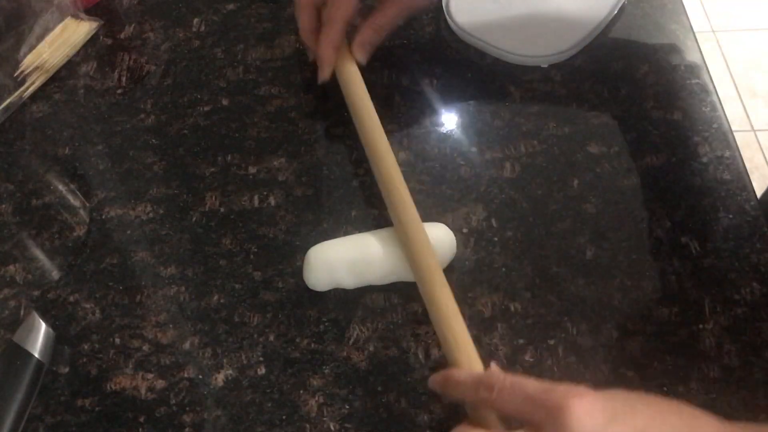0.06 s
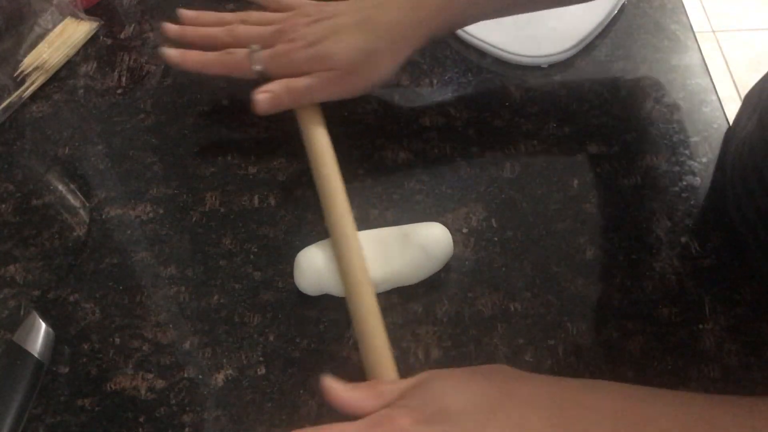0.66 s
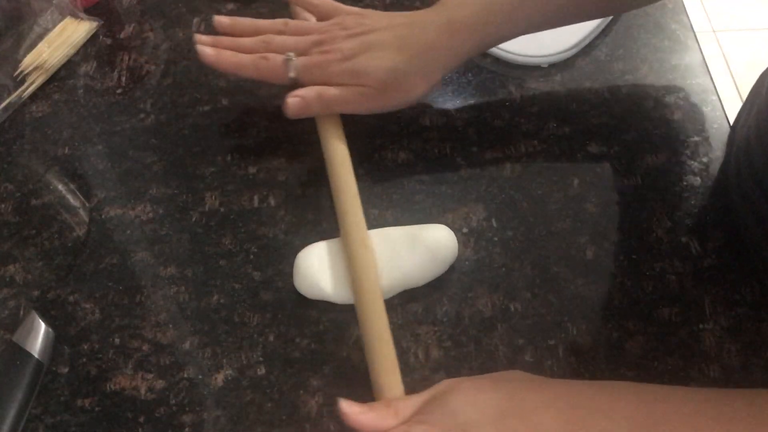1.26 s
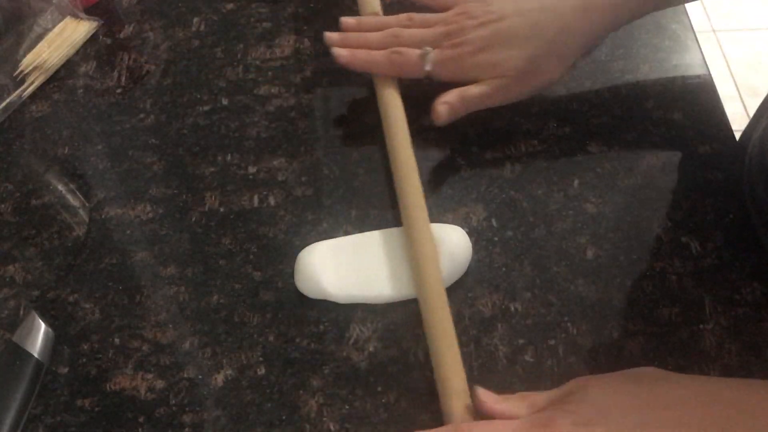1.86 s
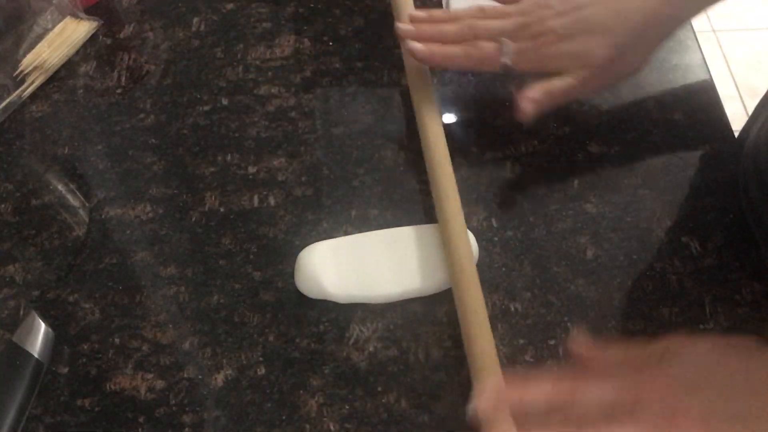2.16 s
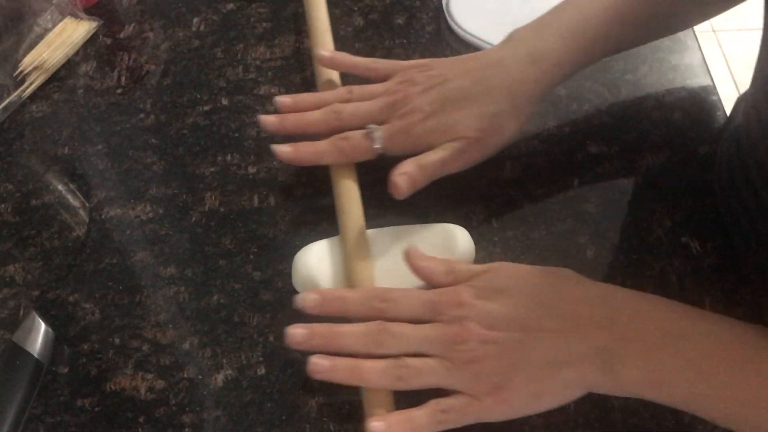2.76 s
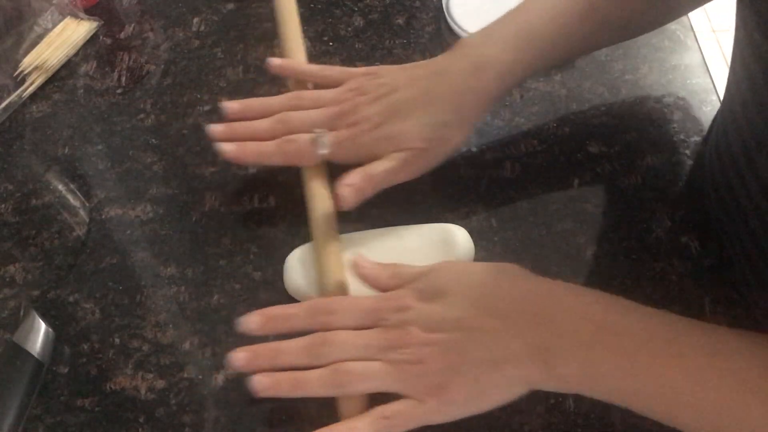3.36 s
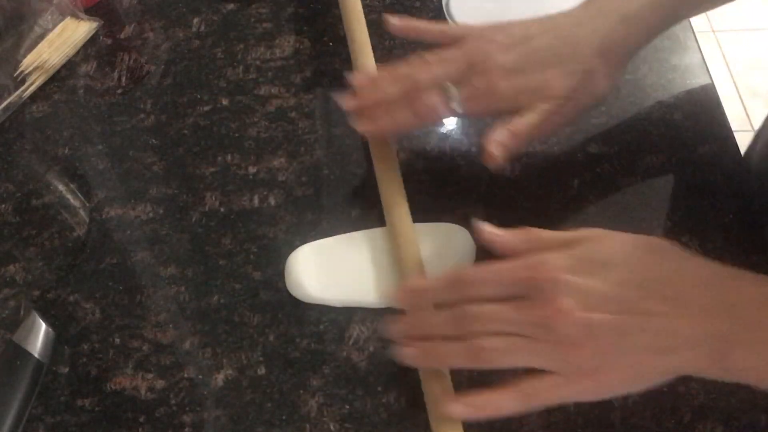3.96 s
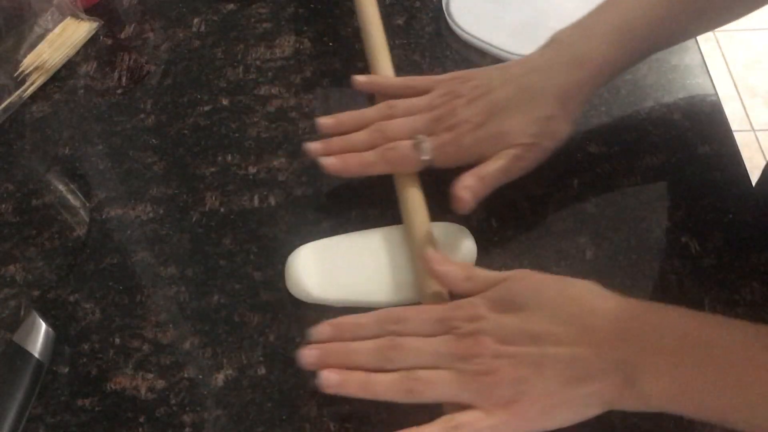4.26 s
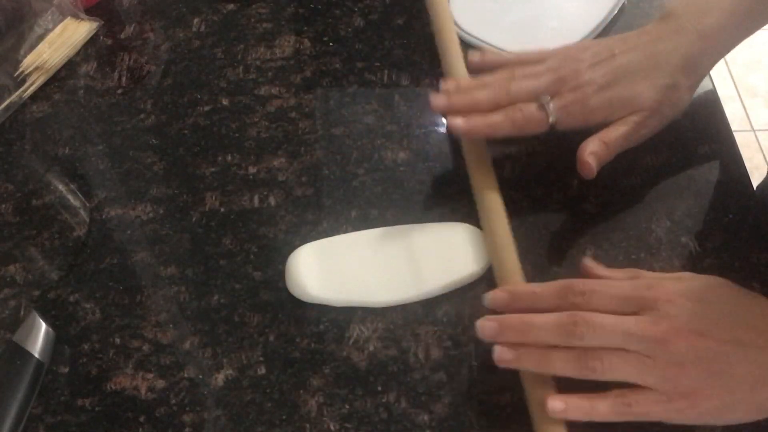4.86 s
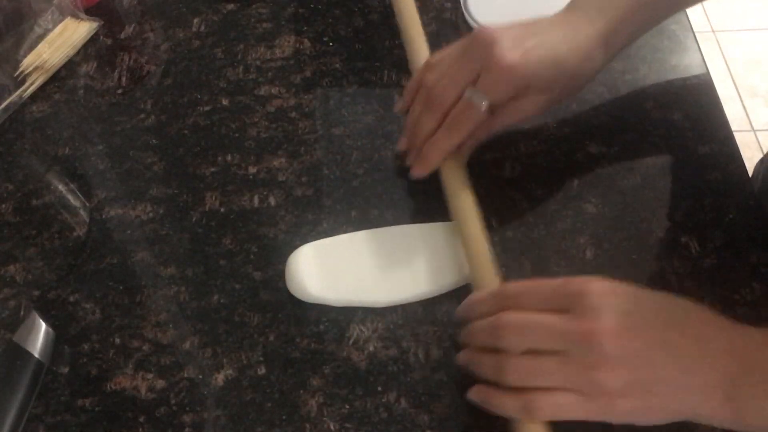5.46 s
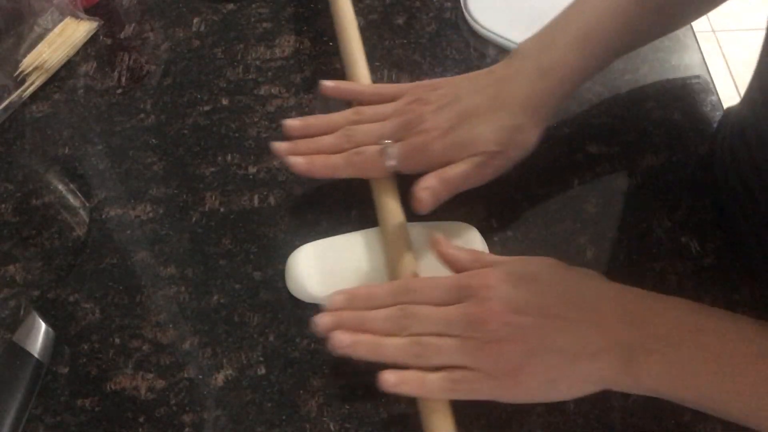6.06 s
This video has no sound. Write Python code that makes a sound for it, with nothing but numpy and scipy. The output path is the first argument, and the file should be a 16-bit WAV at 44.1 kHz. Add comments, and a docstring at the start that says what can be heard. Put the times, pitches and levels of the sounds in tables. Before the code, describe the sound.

A thin wooden rolling pin knocks lightly on a stone countertop as palms brush over it, then clacks down hard once.

```python
"""Rolling pin on a stone countertop

A home kitchen, the microphone close to a thin wooden pin being worked over dough. Its ends knock
on the stone: the rod rings briefly, the counter answers with a hollow note, and once the pin clacks
down hard. Palms brush the wood and the pin rumbles as it rolls. Behind it are the room's short
echo and a low appliance hum."""
import sys
import numpy as np
from scipy import signal
from scipy.fft import rfft, irfft
from scipy.io import wavfile
from scipy.ndimage import uniform_filter1d, minimum_filter1d

SR = 44100
rng = np.random.default_rng(int(sys.argv[2]) if len(sys.argv) > 2 else 0)


def dump_mix(stems):
    """Bounce the given channels to the path in sys.argv[1] as a 16-bit WAV at rate SR."""
    frames = np.atleast_2d(stems).T  # one column per channel
    limited = np.clip(frames, -1, 1)  # hard clip at full scale
    pcm = np.round(limited * 32767).astype(np.int16)
    wavfile.write(sys.argv[1], SR, pcm)


N = 269892
TIME = np.arange(N) / SR
AGE = TIME[:SR // 2]  # time since a blow


# Pin ends on stone, close to the microphone: t/s, wood level/dB, brightness/Hz, counter level/dB, f/Hz
PIN_KNOCKS = [(0.0411, -29, 2450, -51.5, 600), (0.168, -39.5, 2080, -45, 690),
              (0.3167, -43, 2790, -46, 730), (0.3565, -46.5, 2680, -56, 700),
              (0.4408, -46, 1690, -49.5, 760), (0.9125, -34, 1850, -41.5, 660),
              (0.916, -41.5, 4250, -48.5, 680), (1.001, -53, 1370, -48.5, 580),
              (1.3774, -55.5, 1940, -60, 640), (1.39, -65, 1200, -54.5, 640),
              (1.497, -50.5, 2030, -65, 850), (1.5394, -58.5, 1900, -64, 850),
              (2.2826, -56, 1876, -49.5, 760), (2.5265, -63, 3250, -64, 700), (2.677, -61, 2560, -56, 680),
              (2.7046, -54.5, 2130, -51.5, 640), (2.9928, -62, 1600, -61, 680),
              (3.057, -60, 3140, -73, 700), (3.3034, -60.5, 1970, -68, 700), (4.1441, -32, 3860, -46, 1000),
              (4.1651, -33.5, 2740, -38.5, 660), (4.698, -44, 2840, -48.5, 650),
              (4.806, -57.5, 2398, -53.5, 720), (4.875, -19.5, 3000, -32, 700),
              (5.0274, -36.5, 2636, -39.5, 750), (5.7639, -32, 3280, -26.5, 730),
              (6.0195, -52, 1850, -44.5, 630)]

def knocks(doubling_db=19, cabinet_lag_s=.004):
    """Each blow rings the rod, then the counter and its heavy cabinet; returns rod and body apart."""
    rod, body = np.zeros((2, N))
    for s, wood_db, bright_hz, counter_db, pitch_hz in PIN_KNOCKS:
        # a pin pressed down drives the counter harder and sounds longer than one that glances off
        ring_scale = 2 ** np.clip((counter_db - wood_db) / doubling_db, -.7, .4)
        add(rod, s, burst(rod_ring(bright_hz, ring_scale), wood_db))
        add(body, s, burst(counter_note(pitch_hz), counter_db))
        shudder = np.hypot(undb(wood_db - 21), undb(counter_db - 11.5))  # both shake the cabinet
        add(body, s + cabinet_lag_s, shudder * burst(thud(low_hz=135, high_hz=240, t60=0.07), 0))
    return rod, body


# Bending modes of the wooden rod: f/Hz, relative level/dB, unscaled t60/s
ROD_MODES = [(1240, -5.5, 0.013), (1355, -7, 0.0043), (1512, -6, 0.027), (1790, -6.5, 0.039),
             (2091, 1, 0.036), (2494, -5.5, 0.049), (2760, -5, 0.038), (3263, -1, 0.059), (3444, -2, 0.044),
             (3887, -3, 0.029), (4090, -2.5, 0.055), (4520, -0.5, 0.015), (5800, -6, 0.033),
             (6220, -3.5, 0.034), (7600, -5.5, 0.024)]

def rod_ring(bright_hz, ring_scale):
    """The rod's ring and the crack of contact; a softer blow leaves out the high modes."""
    rod = burst(ring(ROD_MODES, ring_scale, scatter_db=2.5, detune=.01), 0)
    crack = burst(butter(rng.standard_normal(len(AGE)), [900, 9000], "band") * fade(0.031 * ring_scale), -2.1)
    softened = butter(rod + crack, 1.28 * bright_hz, "low", order=3)
    return butter(softened, 0.39 * bright_hz, "high")


# Hollow modes of the slab and the cabinet under it: f/Hz, relative level/dB, t60/s
COUNTER_MODES = [(464, -15.5, 0.54), (513.6, -4, 0.3), (603, -11, 0.38), (634, -10.5, 0.24),
                 (668.5, -3, 0.265), (711.5, -7, 0.092), (816.4, -11.5, .15), (891.7, 1, 0.16),
                 (968, -10, 0.11), (1056, -10, 0.2), (1317, -13.5, 0.18)]

def counter_note(pitch_hz, db_per_octave=19):
    """The place of the blow favours modes near one pitch, and the heavy slab starts slowly."""
    modes = [(hz, db - db_per_octave * abs(np.log2(hz / pitch_hz)), t60) for hz, db, t60 in COUNTER_MODES]
    slab = burst(thud(.6 * pitch_hz, 1.5 * pitch_hz, t60=0.2), -9.0)
    note = burst(ring(modes, 1, scatter_db=4.5, detune=.004), 0)
    return (note + slab) * onset(0.0045)


def thud(low_hz, high_hz, t60):
    """Dull shudder of slab or cabinet: a dying band of noise."""
    return butter(rng.standard_normal(len(AGE)) * fade(t60), [low_hz, high_hz], "band")


# The pin falls flat and chatters along its length: t/s, level/dB
CLACK_CONTACTS = [(4.9056, -26.5), (4.9091, -11), (4.9129, -9.5), (4.9145, -15.5)]
# High modes of the stone, woken only by the clack: f/Hz, relative level/dB, unscaled t60/s
STONE_MODES = [(1350, -12, 0.55), (1770, -6.5, 0.6), (2214, -7, 0.35), (2490, -7, .4), (2690, -5.5, 0.55),
               (3400, 2.5, 0.5), (3740, -2.5, 0.3), (4050, -0.5, 0.35), (4115, 2.5, 0.4), (5030, -4, 0.4),
               (5660, -1, 0.68), (5761, -1, 0.35), (6080, -5, 0.44), (6240, -1.5, 0.23), (6800, -4.5, 0.26),
               (7060, -1.5, 0.23)]

def clack():
    """Several hard contacts within milliseconds; the slab rings on and the cabinet booms."""
    out = np.zeros(N)
    for s, db in CLACK_CONTACTS:
        crack = butter(rng.standard_normal(len(AGE)), [2500, 7000], "band")
        crack *= fade(0.042) + 2.3 * fade(0.0064)
        stone = ring(STONE_MODES, 0.098, scatter_db=0, detune=0.00076)
        contact = burst(stone, -0.58) + burst(crack, 0)
        add(out, s, burst(butter(contact, 8200, "low"), db))
    hardest_s = max(CLACK_CONTACTS, key=lambda row: row[1])[0]  # this one shakes the whole slab
    slab = ring(STONE_MODES, 0.31, scatter_db=-1.0, detune=0.001) * onset(0.0035)
    add(out, hardest_s, burst(slab, -30.5))
    add(out, hardest_s, burst(counter_note(pitch_hz=940), -29.0))
    add(out, hardest_s, burst(thud(low_hz=300, high_hz=1370, t60=0.2), -27))
    add(out, hardest_s, burst(thud(low_hz=55.5, high_hz=157.5, t60=0.36), -44))
    return out


# Sharp ticks of hard contact, close up: t/s, peak level/dB
CONTACT_TICKS = [(0.32, -36.5), (2.259, -44.5), (4.146, -39), (4.212, -47), (4.8685, -26), (4.8748, -4),
                 (5.176, -27), (5.766, -29.5), (5.772, -24.5), (5.7822, -25.5)]

def ticks(rebound_s=.0035, rebound_db=-3):
    """Hard contact gives a sharp pulse with a faint scatter behind it, and bounces once."""
    out = np.zeros(N)
    for s, db in CONTACT_TICKS:
        for delay, loss_db in (0, 0), (rebound_s, rebound_db):
            scatter = undb(-20.5) * rng.standard_normal(len(AGE)) * fade(0.033)
            snap = butter(signal.unit_impulse(len(AGE)) + scatter, 1100, "high", order=1)
            snap = butter(snap, 7300, "low", order=1)
            add(out, s + delay, snap * undb(db + loss_db) / np.abs(snap).max())
    return out


# The pin rolling on the countertop: t/s, length/s, level before the envelope/dB
PIN_ROLLS = [(-0.02, 0.17, -56), (2.225, 0.14, -55.5), (2.67, 0.15, -57), (3.358, 0.29, -62.5),
             (4.578, 0.24, -51.5)]

def rolls():
    """Small bumps of the wood keep the counter murmuring around its main note while the pin turns."""
    push = np.zeros(N)
    for s, length, db in PIN_ROLLS:
        add(push, s, undb(db) * stroke(length, rise=.08))
    bumps = rng.standard_normal(N) * undb(4.1 * walk(30))
    murmur = butter(bumps, [590, 770], "band") + undb(-17.5) * butter(bumps, [450, 1500], "band")
    return push * unit(murmur)


# Palms on the wood, close to the microphone: t/s, length/s, level before the envelope/dB, top edge/Hz
PALM_SLIDES = [(-0.01, 0.12, -49, 7500), (0.136, 0.33, -58.5, 13400), (0.403, 0.2, -63.5, 11000),
               (0.599, 0.61, -65, 10900), (1.492, 0.1, -61.5, 12000), (1.754, 0.41, -68.5, 8500),
               (2.252, 0.34, -64, 10100), (2.917, 0.38, -69.5, 7000), (3.679, 0.29, -70.5, 6000),
               (4.588, 0.15, -51.5, 6500), (5.421, 0.21, -64.5, 8600), (5.671, 0.13, -63, 12500)]

def slides(crackles_per_s=60, light_touch_db=-65):
    """Grainy friction of skin on wood, with fine crackles where it lets go; the rod lends it a rasp."""
    out = np.zeros(N)
    slips = rng.random(N) < crackles_per_s / SR
    crackle = slips * undb(7 * np.minimum(rng.exponential(size=N), 3))
    grains = rng.standard_normal(N) * undb(2.4 * walk(150))
    grains += undb(-12.5) * unit(butter(crackle, 6000, "low"))
    rod = signal.fftconvolve(grains, ring(ROD_MODES, 0.19, scatter_db=1.0, detune=0.0028))[:N]
    rasp = unit(butter(grains, [3200, 3600], "band", order=1))
    rub = unit(butter(grains, 1302, "high", order=1)) + undb(-1) * unit(rod)
    for s, length, db, top_hz in PALM_SLIDES:
        shape = stroke(length, rise=.03)
        rasp_db = -5 - 0.57 * (db - light_touch_db)  # a firmer hand damps the rasp
        hiss = np.roll(rub + undb(rasp_db) * rasp, rng.integers(N))[:len(shape)]
        add(out, s, undb(db) * shape * unit(butter(hiss, top_hz, "low")))
    return out


def taps(per_s=5, db=-63.5, spread_db=6.5):
    """The pin wobbles under a sliding hand and taps the stone lightly at chance moments."""
    out = np.zeros(N)
    for start, length, *_ in PALM_SLIDES:
        for wait, force in rng.random((int(length * per_s), 2)):
            tap = rod_ring(bright_hz=3300, ring_scale=0.56)
            add(out, start + wait * length, burst(tap, db + spread_db * (2 * force - 1)))
    return out


def squeak(s, hz, db):
    """Skin sticks on the wood and sings thinly, swelling until it lets go."""
    out = np.zeros(N)
    swell = stroke(0.11, rise=0.06)[::-1] ** 2
    whistle = butter(rng.standard_normal(len(swell)), [hz - 70, hz + 70], "band", order=1)
    add(out, s, undb(db) * swell * unit(whistle))
    return out


def grip_bump(s, db):
    """A soft, deep bump as the hands shift their grip."""
    out = np.zeros(N)
    modes = [(57.9, -10.0, 0.19), (82.0, -13, 0.066), (193, -13.0, 0.083)]
    add(out, s, burst(ring(modes, 0.98, scatter_db=2, detune=0.0083) * onset(0.007), db))
    return out


# Decay of the kitchen around the microphone: f/Hz, t60/s
ECHO_DECAY = [(100, 1.7), (700, 0.85), (2000, 0.5174), (4000, 0.5675), (7000, 0.42), (15000, 0.74)]
# Colour of its echo: f/Hz, relative level/dB
ECHO_COLOUR = [(100, -7), (400, -2.5), (800, -1.5), (1500, -0.5), (4000, -3.5), (7000, -1), (10000, -8.5),
               (15000, -13)]

def kitchen(x, wet_db, gap_s):
    """The direct sound plus the diffuse echo of hard walls and cupboards; the bass lingers longest."""
    hz, age, cells = signal.stft(rng.standard_normal(SR), SR)
    decay = np.exp(-np.log(1000) * age / on_log(ECHO_DECAY, hz)[:, None])
    tail = signal.istft(cells * decay, SR)[1][:SR]
    arrival = np.clip(TIME[:SR] / gap_s - .5, 0, 1)
    tail = colour(tail / np.sqrt(np.sum(tail ** 2)), ECHO_COLOUR) * arrival
    return x + undb(wet_db) * signal.fftconvolve(x, tail)[:N]


# Room tone of the kitchen at the microphone: f/Hz, relative level/dB
AIR_SPECTRUM = [(53, -29.5), (90, -1.5), (103, -4), (234, -6), (345, -7.5), (532, -16), (647, -10.5),
                (769, -16.5), (1140, -22), (2950, -27), (3360, -26), (4960, -29), (15000, -35),
                (16000, -41)]

def room_tone(air_db=-65, hum_hz=52.2, hum_db=-60):
    """Still room air and the wavering hum of an appliance."""
    air = colour(rng.standard_normal(N), AIR_SPECTRUM)
    air = air * undb(air_db + .5 * walk(3)) / np.std(butter(air, 100, "high"))  # level above 100 Hz
    phase = 2 * np.pi * np.cumsum(hum_hz + 1.2 * walk(4)) / SR
    hum = np.sin(phase) * undb(2 * walk(4))
    rumble = butter(rng.standard_normal(N), [42, 75], "band")
    return air + undb(hum_db) * (unit(hum) + undb(-10) * unit(rumble))


def ring(modes, ring_scale, scatter_db, detune):
    """Struck modes (f/Hz, level/dB, t60/s); the blow's place and the grip vary weights and pitch."""
    out = 0
    for hz, db, t60 in modes:
        weight, shift = rng.standard_normal(2)
        tone = np.sin(2 * np.pi * (hz * (1 + detune * shift) * AGE + rng.random()))
        out = out + undb(db + scatter_db * weight) * fade(t60 * ring_scale) * tone
    return out


def stroke(length, rise):
    """Envelope of a hand movement: swells over the share `rise` of its length, then dies away."""
    progress = np.linspace(0, 1, int(max(length, .01) * SR))
    return (1 - np.exp(-progress / max(rise, .01))) * (1 - progress)


def onset(rise_s):
    """Soft start of a blow."""
    return 1 - np.exp(-AGE / rise_s)


def fade(t60):
    """Free decay, 60 dB in t60 seconds."""
    return np.exp(-np.log(1000) * AGE / max(t60, 1e-3))


def walk(hz):
    """Random drift with an rms of 1."""
    return unit(butter(rng.standard_normal(N), hz, "low"))


def undb(db):
    """Decibels to gain."""
    return 10 ** (np.asarray(db) / 20)


def unit(x):
    """Scale to rms 1."""
    return x / np.sqrt(np.mean(x ** 2))


def burst(x, db):
    """Scale a blow so that its loudest 4 ms have this level."""
    return x * undb(db) / np.sqrt(uniform_filter1d(x ** 2, 176, mode="constant").max())


def on_log(points, hz):
    """Read (f/Hz, value) points on a log-frequency axis."""
    f, value = np.transpose(points)
    return np.interp(np.log(hz + 1), np.log(f), value)


def colour(x, points):
    """Filter by a curve of (f/Hz, level/dB) points."""
    return irfft(rfft(x) * undb(on_log(points, np.fft.rfftfreq(len(x), 1 / SR))), len(x))


def butter(x, hz, kind, order=2):
    """Causal low-, high- or band-pass."""
    return signal.sosfilt(signal.butter(order, np.clip(hz, 5, SR / 2 - 500), kind, fs=SR, output="sos"), x)


def add(track, s, x):
    """Mix a sound into a track at time s."""
    start = int(s * SR)
    x, start = x[max(-start, 0):], max(start, 0)
    track[start:start + len(x)] += x[:N - start]


def scene():
    """Pin and hands close to one microphone, the kitchen behind them."""
    rod, body = knocks()
    near = rod + taps() + slides() + squeak(s=.63, hz=4520, db=-59) + grip_bump(s=5.482, db=-43.5)
    sound = kitchen(near, wet_db=-8.0, gap_s=0.0027)
    sound += kitchen(ticks(), wet_db=-4.5, gap_s=0.0063)
    sound += kitchen(clack(), wet_db=-7.5, gap_s=0.011)
    sound += kitchen(body + rolls(), wet_db=-11.5, gap_s=0.013)
    return (sound + room_tone())[None]


def record(dry):
    """The recorder turns down after a loud peak, recovers slowly, limits the clack and cuts the top."""
    full_scale_cut_db, attack_hz, release_s, top_hz = -2.5, 1.7, 0.58, 16200
    release = np.exp(-TIME / release_s)
    held_peak = np.maximum.accumulate(np.minimum(np.abs(dry), 1) / release, axis=-1) * release
    control = signal.sosfilt(signal.butter(1, attack_hz, fs=SR, output="sos"), held_peak)
    ducked = dry * undb(full_scale_cut_db * control)
    limiter = 1 / np.maximum(np.abs(ducked), 1)
    limiter = uniform_filter1d(minimum_filter1d(limiter, size=45), size=45)  # eased over 1 ms
    return signal.sosfilt(signal.ellip(10, .2, 70, top_hz, fs=SR, output="sos"), ducked * limiter)


dry = scene()
out = record(dry)
dump_mix(out)
```